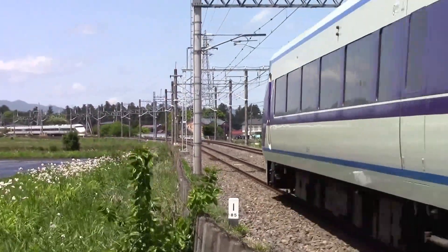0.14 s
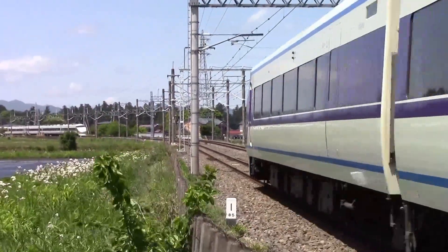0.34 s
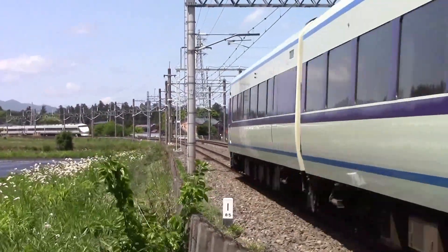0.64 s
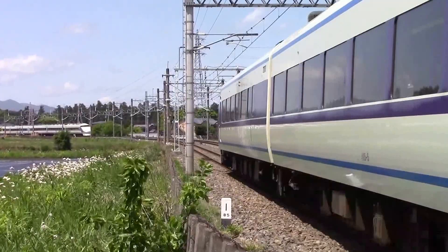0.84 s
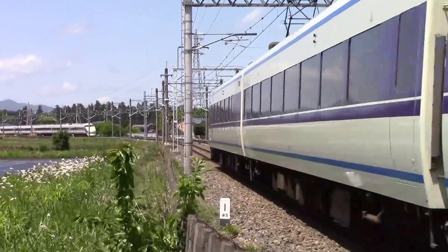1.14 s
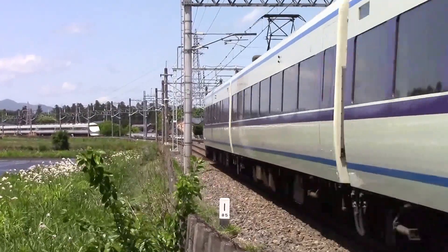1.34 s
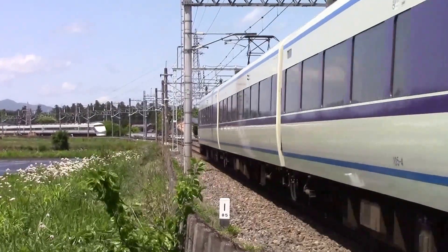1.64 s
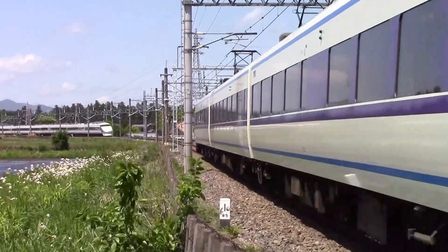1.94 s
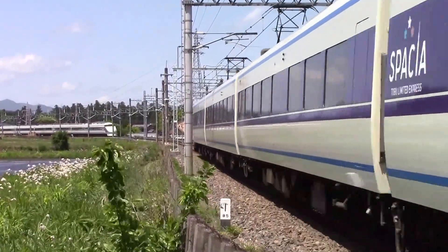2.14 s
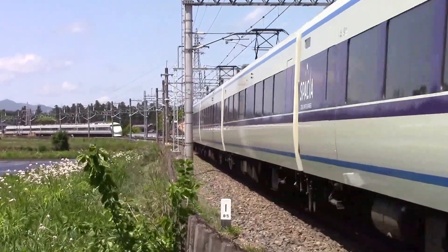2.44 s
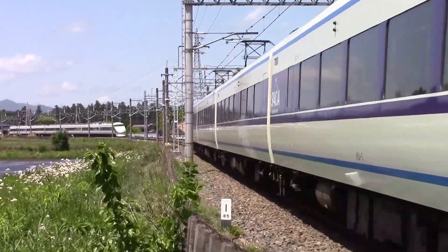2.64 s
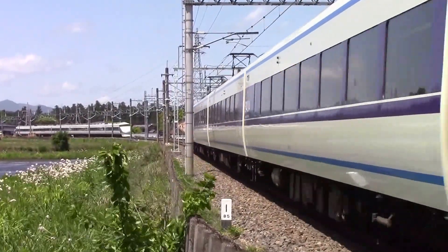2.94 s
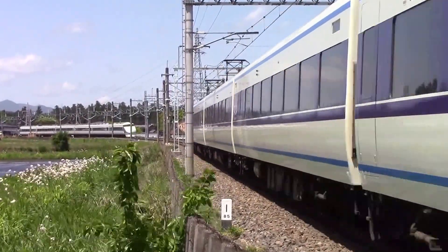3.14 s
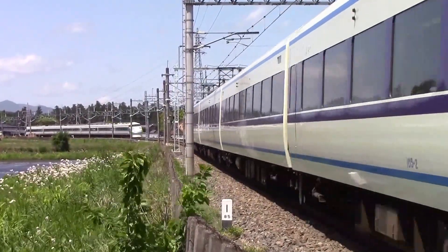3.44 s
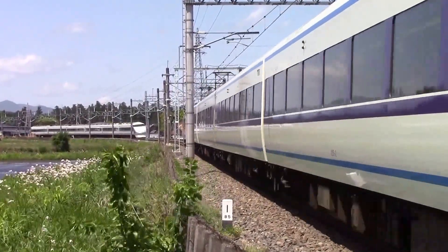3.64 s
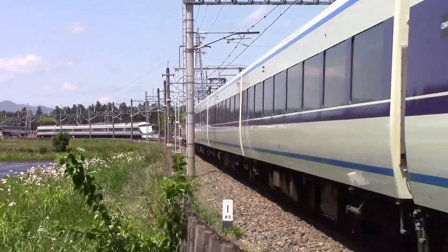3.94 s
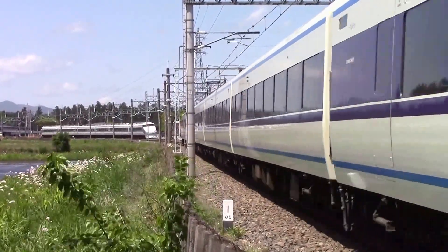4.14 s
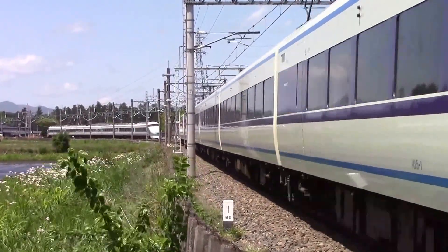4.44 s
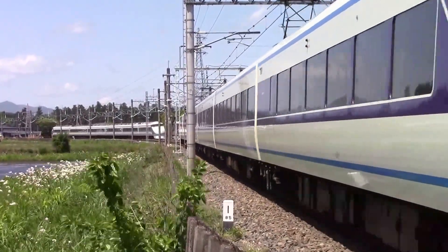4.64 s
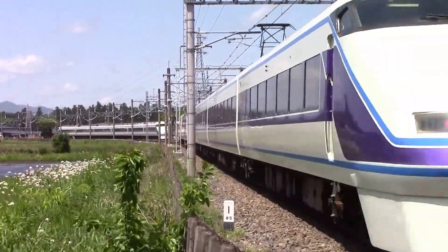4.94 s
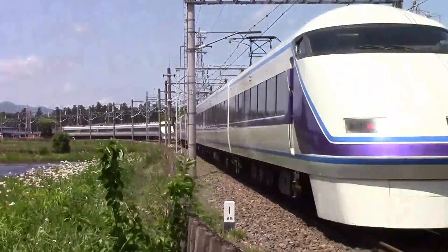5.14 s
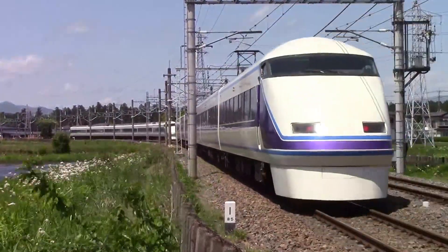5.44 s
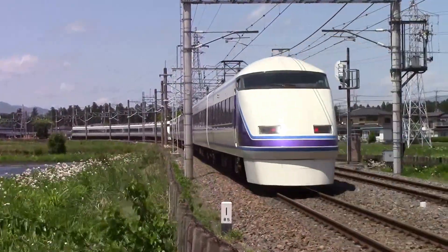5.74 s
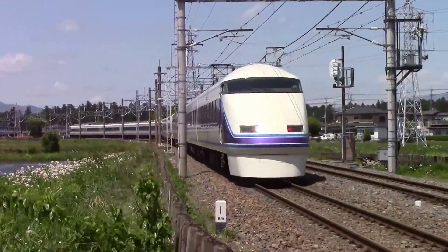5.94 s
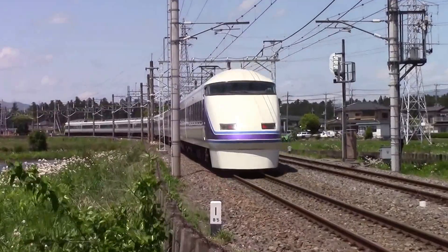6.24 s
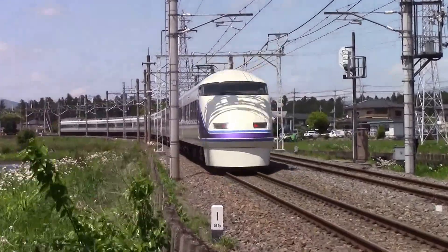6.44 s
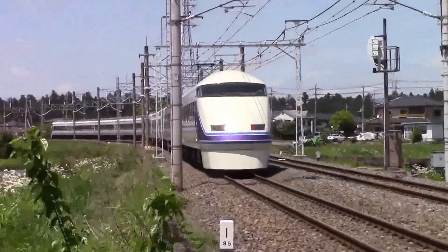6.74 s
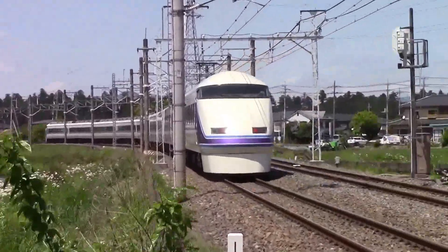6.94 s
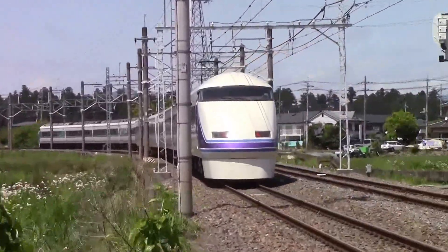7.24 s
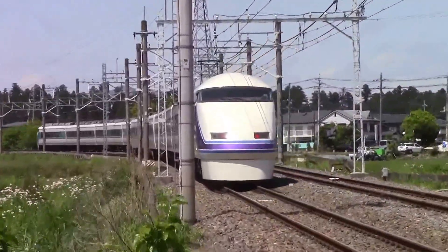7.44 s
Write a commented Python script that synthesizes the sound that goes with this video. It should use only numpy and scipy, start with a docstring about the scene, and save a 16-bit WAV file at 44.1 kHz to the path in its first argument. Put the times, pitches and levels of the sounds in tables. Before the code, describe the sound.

In open country, a fast electric train passes a few metres away. Bright, rough wheel roar and airy hiss surge in pairs as each coupling goes by, with ringing metal tones and brief squeals. After about four and a half seconds the tail passes and the roar falls away, leaving a high wavering whine and faint hum. Wind from its wake thumps the microphone. Outdoor stereo, wide alongside, narrowing with distance.

```python
"""Beside a railway line in open country, an electric express runs past a few metres away and recedes.
Each bogie (wheel set) brings a swell of rolling noise and hiss, made of coloured noise. Some wheels sing:
randomly driven tones that fall in pitch by the Doppler law as they go by, joined by brief squeals.
A high whine, a thin whistle and a low hum, made the same way or as plain sines, carry on from far off.
The wake buffets the microphone with gusts of noise, filtered thumps and short tonal puffs."""
import sys
import numpy as np
from scipy import signal
from scipy.fft import rfft, irfft, next_fast_len
from scipy.io import wavfile

SR = 44100
rng = np.random.default_rng(int(sys.argv[2]) if len(sys.argv) > 2 else 0)


def master_out(mix):
    """Clip the mix to full scale and print it as 16-bit PCM to the path in sys.argv[1]."""
    frames = np.transpose(np.atleast_2d(mix))
    ceiling = np.clip(frames, -1, 1)
    pcm = np.round(ceiling * 32767).astype(np.int16)
    wavfile.write(sys.argv[1], SR, pcm)


N = 334454

# Noise colours, relative levels: (frequency [Hz], level [dB per Hz])
ROAR_COLOUR = [(480, -48), (630, -19), (720, -10), (830, -1.5), (940, -7), (1030, -3.5), (1130, 0),
               (1300, 2), (1430, 1.5), (1600, 3.5), (1950, 2), (2300, -0.5), (2800, -11), (4000, -16.5)]
RASP_COLOUR = [(1700, -38), (2300, 0.5), (2850, 1.5), (3200, 0.5), (3550, 0), (4100, -5), (4800, -10),
               (5600, -12.5), (7000, -18.5), (10000, -79)]
HISS_COLOUR = [(2600, -0.5), (4500, -5.5), (5700, -2), (6700, 2), (7600, 0), (8600, -4.5), (10000, -8.5),
               (11500, -12.5), (13000, -19.5), (15500, -24.5)]
GEAR_COLOUR = [(90, -26), (145, -36), (190, -8), (250, -8.5), (310, -1.5), (375, 3.5), (440, -4),
               (520, -2.5), (650, -16)]
TRACK_COLOUR = [(260, -41), (430, -13), (510, 2.5), (600, 2.5), (690, 4.5), (810, 2), (1050, 3.5)]
AIR_COLOUR = [(15, -8), (30, -6), (48, -1), (100, -8), (160, -5), (300, -2), (600, -32)]
COUNTRY_COLOUR = [(25, -36), (100, -33), (250, -27), (500, -21), (800, -4.5), (1500, 1), (4000, -6),
                  (9000, -23), (15000, -44)]
# How alike left and right are: (frequency [Hz], likeness [0 to 1])
LIKENESS = [(40, .3), (130, .85), (290, .99), (640, .999), (1700, .999), (3100, .97), (5000, .76),
            (6800, .7), (10000, .76), (15000, .8)]

# Bogies come abeam, a pair at each coupling and one at the tail. Levels are relative; brightness is rasp
# over roar: (time [s], roar [dB], brightness [dB], running gear [dB])
BOGIES = [(0.04, -27.5, 0.5, -59), (0.25, -35.5, 7, -69), (0.82, -26, -0.5, -70), (1.13, -26, 2.5, -72),
          (1.66, -24, -0.5, -74), (2.018, -24, 1.5, -67), (2.63, -28, -2.5, -54), (2.91, -27.5, 0.5, -71),
          (3.53, -27.5, -2.5, -64), (3.82, -28, 1, -69), (4.431, -28.5, -1, -50.5)]
SPEED_M_PER_S, DISTANCE_M, SOUND_M_PER_S = 22, 4.0, 343
# How steeply each sound falls off as its bogie moves away (power of the distance)
ROAR_FALLOFF, GEAR_FALLOFF, HISS_FALLOFF = 2.0, 1.77, 1.05
BOGIE_HISS_DB = -39.5  # relative level
# Wheels jolt over rough spots of the rail: (time [s], relative roar [dB])
JOLTS = [(0.64, -29.5), (0.96, -27.5), (2.53, -29), (3.02, -52), (4.38, -27.5), (4.525, -31.5), (6.13, -38)]
JOLT_HALF_S, JOLT_GEAR_DB = 0.039, -35  # the gear level is added to the jolt's own
# The rest of the train, heard along the line, relative levels:
# (time [s], roar [dB], hiss [dB], track [dB], running gear [dB])
FAR_TRAIN = [(0.4, -31, -41.5, -64, -67), (1.4, -35.5, -44, -65, -86), (2.35, -31.5, -44.5, -58, -66),
             (3.25, -37.5, -42.5, -77, -61), (4.2, -36, -40, -57, -62), (4.95, -42.5, -41.5, -56, -71),
             (5.65, -43.5, -46, -54.5, -66), (6.15, -38, -41.5, -49, -61), (6.48, -42.5, -50, -47.5, -66),
             (7.05, -44.5, -52, -51, -65), (7.28, -44, -51, -58, -80), (7.58, -42, -51.5, -44, -65)]
# Spurts of hissing air: (start time [s], relative level [dB])
SPURTS = [(.53, -32), (4.41, -37.5), (5.36, -46), (6.55, -50.5)]
SPURT_ATTACK_S, SPURT_FADE_DB_PER_S = 0.084, 47
# Pits in the running surface ring the rail in short streaks; a ring fades by 60 dB in PIT_RING_S
PITS_PER_S, PIT_SPREAD_DB, PIT_RING_S = 220, 3.0, .075
RAIL_LOW_HZ, RAIL_HIGH_HZ = 1100, 3747
PIT_DB = -6.5  # relative to the roar of the passing bogies

# Some cars set the track droning while they pass, relative levels:
# (start [s], end [s], track [dB], running gear [dB])
DRONES = [(0.52, 1.18, -46.5, -80), (1.215, 2.05, -48, -86), (2.505, 3.023, -48.5, -52.5),
          (4.037, 4.317, -51, -64), (4.294, 4.544, -51, -64)]
DRONE_EDGE_S = 0.018
# Gaps and boxes under the cars push air aside: (time [s], half length [s], relative level [dB])
AIR_PUSHES = [(.06, .12, -70), (0.656, .025, -71.5), (.98, 0.17, -68), (1.62, 0.034, -65),
              (2.01, 0.079, -63.5), (2.53, 0.023, -65), (4.444, .025, -70)]
FAR_AIR_DB = -83.5  # relative level

# Singing wheels: (time abeam [s], frequency at rest [Hz], width [Hz], level at closest [dB])
SINGING = [(-0.12, 6330, 35, -33.5), (-0.08, 3700, 110, -27), (0.02, 6650, 450, -33),
           (0.079, 1636, 141, -29), (0.17, 1482, 45, -30), (1.04, 1486, 70, -32), (0.3, 6310, 260, -37),
           (0.76, 6260, 220, -30), (1.07, 6280, 140, -35), (1.95, 6460, 300, -49), (0.76, 1465, 81, -28),
           (0.859, 1695, 89.7, -33), (0.88, 6620, 750, -28.5), (1.66, 6360, 700, -30.5),
           (1.98, 1717, 128, -30.5), (2.0, 2460, 110, -31), (2.8, 6720, 240, -36.5), (3.7, 6740, 220, -41),
           (4.299, 1617, 120, -39)]
SING_LAG_S, SING_FALLOFF = 0.11, 1.8  # a wheel is loudest just after it has passed
SING_WAVER, SING_WAVER_RATE = 0.00497, 24.8  # share of the pitch; times a second
# Brief squeals of the flanges: (time [s], half length [s], frequency [Hz], width [Hz], level [dB])
SQUEALS = [(.112, .014, 1545, 40, -28), (.26, .016, 1530, 45, -30), (0.429, .11, 1410, 24, -30.5),
           (.635, .018, 1470, 23.7, -24.5), (0.822, 0.087, 2910, 54, -31.5), (.86, .02, 1460, 39.7, -26),
           (0.869, .014, 1665, 60, -26), (0.946, .018, 1405, 40, -30), (1.003, .009, 1400, 40, -25),
           (1.235, .025, 1440, 45, -31), (1.33, .025, 1385, 45, -41), (1.246, 0.024, 3530, 120, -26),
           (1.612, .03, 3650, 160, -29), (1.853, .013, 1660, 70, -23), (1.905, 0.022, 2880, 45, -22.5),
           (2.034, 0.039, 3050, 597, -23), (2.06, .035, 1625, 100, -25), (2.14, .05, 3300, 400, -33),
           (2.525, .03, 1230, 44, -33), (2.539, 0.03, 3670, 110, -28.5), (3.025, .016, 1520, 170, -25),
           (3.406, .02, 2630, 70, -29.5), (4.02, 0.018, 2430, 100.1, -23), (4.212, 0.019, 2600, 100.5, -37),
           (4.628, 0.024, 2360, 70, -29), (5.976, 0.028, 2320, 80.8, -27), (6.097, 0.028, 2305, 80, -25),
           (6.145, 0.024, 3550, 400, -33)]
SQUEAL_SAG_PER_S = 0.085  # share of the pitch

# Rough chorus of the wheels going by: (time [s], frequency [Hz], level [dB])
CHORUS = [(2.35, 2524, -60), (2.55, 2527, -39), (2.72, 2465, -28.5), (2.93, 2460, -27.5), (3.09, 2500, -30),
          (3.25, 2570, -34), (3.41, 2550, -30), (3.55, 2476, -29.5), (3.7, 2448, -26.5), (3.92, 2400, -26),
          (4.03, 2464, -34), (4.12, 2480, -30.5), (4.22, 2555, -32), (4.3, 2490, -29.5), (4.4, 2470, -24),
          (4.51, 2430, -27.5), (4.66, 2380, -29.5), (5.0, 2370, -64)]
CHORUS_WIDTH_HZ = 236
# One wheel stands out of the chorus and wavers about its centre (level before the sum is scaled)
LEAD_DB, LEAD_WIDTH_HZ, LEAD_WAVER, LEAD_WAVER_RATE = -5, 55, .02, 9

# Whine of the distant wheels: (time [s], level [dB])
WHINE = [(4.4, -48), (4.85, -35), (5.1, -37), (5.22, -41.5), (5.37, -36.5), (5.55, -41), (6.05, -33.5),
         (6.42, -37), (6.65, -36), (7.05, -41.5), (7.165, -37), (7.205, -41), (7.245, -35), (7.3, -44),
         (7.38, -32.5), (7.58, -38)]
# Its separate tones come and go:
# (settled frequency [Hz], width [Hz], relative level [dB], strongest at [s], half length [s])
WHINE_LINES = [(2207, 7.2, -6, 6.57, 0.35), (2300, 5.3, -1.5, 6.76, 0.2), (2316, 24, -5.5, 6.1, 0.36),
               (2380, 21, -3.5, 7.12, 0.21), (2278, 120, -2.5, 5.2, 3), (2408, 200, -2.5, 5, 2.5),
               (1116, 60, -14.5, 6.46, 0.9), (1575, 70, -11, 6.87, 0.22), (7250, 900, -11.5, 5.4, .8),
               (3650, 450, -12, 5.1, .7)]
# Shares of the pitch (waver; sag per second); time [s] by which it has stopped sinking
WHINE_WAVER, WHINE_SAG_PER_S, WHINE_SETTLES_S = 0.002005, .008, 6.3
WHINE_THROB_DB, WHINE_THROB_RATE = 0.3, 26  # beating between the wheels; times a second
# A thin whistle far above the whine: (time [s], frequency [Hz], level [dB])
WHISTLE = [(5.8, 12260, -95), (6.12, 12230, -71), (6.3, 12170, -76), (6.7, 12150, -73), (6.95, 12105, -70),
           (7.12, 12200, -71.5), (7.3, 12090, -95)]
WHISTLE_WIDTH_HZ = 22
# Electric hum: (time [s], frequency [Hz], level [dB])
HUM = [(4.6, 732.7, -56), (5.15, 724, -61), (5.5, 728, -49), (5.85, 728, -48.5), (6.2, 723, -43.5),
       (6.42, 722, -50), (7.02, 719, -51.5), (7.58, 710, -66)]
# The train's sound drops abruptly near the end
DROP_S, DROP_LENGTH_S, DROP_DB = 7.05, 0.025, -7.5

# Wake sounds; their levels are those ahead of the wind filter.
# Gusts on the microphone: (time [s], half length [s], level [dB])
GUSTS = [(5.757, 0.019, -56), (5.947, 0.058, -60), (6.447, 0.02, -47), (6.491, .018, -54),
         (6.564, 0.023, -51.5), (6.624, 0.018, -49.5), (6.707, 0.0096, -50.5), (6.825, .025, -51.5),
         (6.897, .018, -49), (6.954, 0.018, -48.5), (7.03, 0.059, -59), (7.152, 0.039, -63),
         (7.433, .04, -72)]
GUST_HZ, GUST_AT_DB, GUST_DB_PER_OCTAVE = 418, -41.5, 54  # stronger gusts sound higher
GUST_WIDTH_SHARE = 0.79  # bandwidth over pitch
# Single eddies thump against the microphone: (time [s], peak level [dB], upper edge [Hz])
THUMPS = [(6.44, -24.5, 1210), (6.4445, -33, 900), (6.4475, -31, 950), (6.454, -32, 750),
          (6.4645, -32, 600), (6.4755, -35, 850), (6.4955, -31, 1350), (6.545, -42, 550), (6.573, -37, 600),
          (6.592, -32, 1100), (6.6025, -31, 650), (6.6095, -33, 600), (6.6315, -30.5, 600),
          (6.701, -38, 650), (6.714, -38, 600), (6.785, -40, 600), (6.822, -33, 750), (6.842, -41, 650),
          (6.87, -34, 520), (6.8995, -24, 850), (6.9035, -33, 900), (6.9138, -27, 1250), (6.918, -35, 500),
          (6.948, -28, 650), (6.953, -30, 1000), (6.966, -41, 500), (7.004, -41, 790), (7.168, -39, 704),
          (7.249, -45, 750)]
THUMP_LOW_HZ, THUMP_TAIL_S, THUMP_TAIL_DB = 268, 0.0042, -24  # each leaves a brief flutter behind
# Rustling among the puffs: (time [s], half length [s], frequency [Hz], width [Hz], level [dB])
RUSTLES = [(7.44, .017, 3350, 700, -42.5), (7.46, .018, 1330, 420, -36.5), (7.515, .018, 601, 400, -47),
           (7.534, .012, 1153, 750, -41), (7.575, 0.0091, 2700, 1300, -40)]
# Short tonal puffs of wind on the microphone: (time [s], rise [s], frequency [Hz], peak level [dB])
PUFFS = [(7.1672, .001, 1000, -31.5), (7.1845, 0.0013, 950, -36), (7.208, .002, 850, -43),
         (7.3442, .002, 1150, -36.5), (7.449, .0032, 1510, -26), (7.456, 0.0013, 1200, -29),
         (7.4625, .0012, 1250, -29), (7.468, .002, 1350, -36), (7.492, 0.0018, 700, -34),
         (7.496, .0015, 950, -32), (7.5053, 0.0032, 900, -26), (7.5088, 0.0012, 1790, -26),
         (7.513, 0.0022, 625, -32), (7.536, .0018, 950, -32), (7.541, .0016, 1150, -33),
         (7.546, .0016, 650, -37)]

# The two microphone ports for sound from the side: (frequency [Hz], left [dB], right [dB])
PORTS = [(1550, 0, 0), (2400, .7, -.8), (3900, 1.9, -2.4), (5300, 2.8, -1.5), (7500, 3.8, .3), (8600, 6, 3),
         (10000, 6, 4), (12600, 1.5, 1.5), (15200, -2, -2)]
# How far the left port lags behind the right: (frequency [Hz], lag [radians])
PORT_LAG = [(1300, 0), (2400, .03), (3900, .2), (5300, .9), (7500, 1.3), (8500, 2.05), (9500, 2.45),
            (12000, 3.05), (15200, 3.14)]
# How much of the train's sound arrives from the side: (time [s], share [0 to 1])
BESIDE = [(0, 1), (4.5, 1), (4.8, .65), (5.1, .15), (5.6, .05), (7.58, 0)]
FAR_WIDTH_DB = -4.5  # the sound narrows as the train recedes
STEADY_BELOW_HZ = 43  # a ring narrower than this holds its strength more evenly
CUTOFF_HZ = 15700


def rolling():
    """Rough steel on steel: a roar and brief rings from the rails, a rasp from the wheels, and hissing air."""
    _, roar_db, bright_db, _ = np.transpose(BOGIES)
    far_db, far_hiss_db, _, _ = in_time(FAR_TRAIN)
    surge = jolts()
    near = passing(roar_db, ROAR_FALLOFF)
    far = from_db(far_db)
    roar = together(near, surge, far)
    rasp = together(passing(roar_db + bright_db, ROAR_FALLOFF), surge, far)
    bogie_hiss = passing([BOGIE_HISS_DB] * len(BOGIES), HISS_FALLOFF)
    spurts = [spurt(s, db) for s, db in SPURTS]
    hiss = together(bogie_hiss, *spurts, from_db(far_hiss_db))
    streaks = from_db(PIT_DB) * near * pits()
    # the small gains balance the three noises
    roar_noise = roar * from_db(0.5) * rush(ROAR_COLOUR, flutter_db=0.4, flutter_rate=34)
    rasp_noise = rasp * from_db(1.38) * rush(RASP_COLOUR, flutter_db=0.7, flutter_rate=14)
    hiss_noise = hiss * from_db(4.5) * rush(HISS_COLOUR, flutter_db=0.5, flutter_rate=14.0)
    return streaks + roar_noise + rasp_noise + hiss_noise


def jolts():
    """Strength of the short surges as wheels hit rough spots."""
    return sum(from_db(db) * bump(s, JOLT_HALF_S) for s, db in JOLTS)


def spurt(s, db):
    """Strength of a spurt of air: a quick rise and a steady fade."""
    t = np.arange(N) / SR - s
    rise = np.sqrt(np.clip(t / SPURT_ATTACK_S, 0, 1))
    return rise * from_db(db - SPURT_FADE_DB_PER_S * np.maximum(t - SPURT_ATTACK_S, 0))


def pits():
    """Wheels hit tiny pits at random; each hit rings one of the rail's many modes for a moment; rms 1."""
    count = 24
    hits = int(PITS_PER_S * N / SR)
    at = rng.integers(0, N, hits)
    mode = rng.integers(0, count, hits)
    sizes = from_db(PIT_SPREAD_DB * np.minimum(rng.exponential(1, hits), 3))
    sizes = sizes * rng.choice([-1, 1], hits)
    out = np.zeros(N)
    decay = from_db(-60 / (PIT_RING_S * SR))  # shrinkage per sample
    for k, hz in enumerate(np.linspace(RAIL_LOW_HZ, RAIL_HIGH_HZ, count)):
        w = 2 * np.pi * hz * rng.uniform(.985, 1.015) / SR
        clicks = np.bincount(at, sizes * (mode == k), N) + 1e-18
        out += signal.lfilter([0, np.sin(w)], [1, -2 * decay * np.cos(w), decay * decay], clicks)
    high_pass = signal.butter(6, RAIL_LOW_HZ, "high", fs=SR, output="sos")
    return rms_one(signal.sosfilt(high_pass, out))


def underside():
    """Running gear rumbles, the track drones under the load, and displaced air throbs, more on the left."""
    _, _, _, gear_db = np.transpose(BOGIES)
    _, _, far_track_db, far_gear_db = in_time(FAR_TRAIN)
    track_drone = sum(from_db(db) * held(start, end) for start, end, db, _ in DRONES)
    gear_drone = sum(from_db(db) * held(start, end) for start, end, _, db in DRONES)
    gear_jolts = from_db(JOLT_GEAR_DB) * jolts()
    gear = together(passing(gear_db, GEAR_FALLOFF), gear_drone, gear_jolts, from_db(far_gear_db))
    track = together(track_drone, from_db(far_track_db))
    pushes = [from_db(db) * bump(s, half_s) for s, half_s, db in AIR_PUSHES]
    air = together(*pushes, from_db(FAR_AIR_DB))
    left_heavy = from_db([[2.2], [-2.2]])
    gear_noise = gear * rush(GEAR_COLOUR, flutter_db=1.0, flutter_rate=8.5)
    track_noise = track * from_db(1.0) * rush(TRACK_COLOUR, flutter_db=2.5, flutter_rate=15)
    air_noise = air * left_heavy * rush(AIR_COLOUR, flutter_db=3.0, flutter_rate=12)
    return gear_noise + track_noise + air_noise


def wheel_rings(throb_db=0.5):
    """Wheels sing, gliding down as they pass, and flanges squeal; the rough rail feeds them unevenly."""
    out = np.zeros(N)
    for s, hz, width_hz, db in SINGING:
        pitch = hz * doppler(s) * (1 + SING_WAVER * drift(SING_WAVER_RATE))
        fading = distance_ratio(s + SING_LAG_S) ** SING_FALLOFF
        out += from_db(db) * resonance(pitch, width_hz) / fading
    for s, half_s, hz, width_hz, db in SQUEALS:
        add_swell(out, s, half_s, hz, -SQUEAL_SAG_PER_S * hz, width_hz, db)
    return from_db(throb_db * drift(39)) * out


def chorus(throb_db=1.0, throb_rate=32):
    """Rear wheels sing in a rough band that rises between the bogies and sinks as each goes by."""
    hz, level_db = in_time(CHORUS)
    lead_hz = hz * (1 + LEAD_WAVER * drift(LEAD_WAVER_RATE))
    lead = from_db(LEAD_DB) * resonance(lead_hz, LEAD_WIDTH_HZ)
    voices = rms_one(resonance(hz, CHORUS_WIDTH_HZ) + lead)
    return from_db(level_db + throb_db * drift(throb_rate)) * voices


def whine():
    """Far off, many wheels sing in a rough band that sinks slowly, then settles; single ones stand out."""
    level_db, = in_time(WHINE)
    shift = 1 + WHINE_SAG_PER_S * np.maximum(WHINE_SETTLES_S - np.arange(N) / SR, 0)
    wheels = np.zeros(N)
    for hz, width_hz, db, s, half_s in WHINE_LINES:
        pitch = hz * (shift + WHINE_WAVER * drift(7.57))
        wheels += from_db(db) * bump(s, half_s) * resonance(pitch, width_hz)
    return from_db(level_db + WHINE_THROB_DB * drift(WHINE_THROB_RATE)) * wheels


def whistle():
    """A thin whistle, a narrow wandering tone that mostly sinks, follows the train away."""
    hz, level_db = in_time(WHISTLE)
    return from_db(level_db) * resonance(hz, WHISTLE_WIDTH_HZ)


def hum(waver_hz=1.34, waver_db=2.0, whirr_hz=805, whirr_width_hz=22, whirr_db=-7):
    """A nearly pure tone from the electrical gear wavers in the moving air, with a softer whirr above it."""
    hz, level_db = in_time(HUM)
    phase = 2 * np.pi * np.cumsum(hz + waver_hz * drift(12.0)) / SR
    tone = from_db(waver_db * drift(8.9)) * np.sqrt(2) * np.sin(phase)
    whirr = from_db(whirr_db) * resonance(whirr_hz, whirr_width_hz)
    return from_db(level_db) * (tone + whirr)


def wake(lumpy_db=3.0):
    """The wake breaks on the microphone in lumpy gusts, thumps and puffs, thinned by its wind filter."""
    out = np.zeros(N)
    for s, half_s, db in GUSTS:
        hz = GUST_HZ * 2 ** ((db - GUST_AT_DB) / GUST_DB_PER_OCTAVE)
        add_swell(out, s, half_s, hz, 0, GUST_WIDTH_SHARE * hz, db)
    out = out * from_db(lumpy_db * drift(89))
    for s, db, top_hz in THUMPS:
        add_thump(out, s, db, top_hz)
    for s, half_s, hz, width_hz, db in RUSTLES:
        add_swell(out, s, half_s, hz, 0, width_hz, db)
    for s, rise_s, hz, db in PUFFS:
        add_puff(out, s, rise_s, hz, db)
    wind_filter = signal.butter(4, 160, "high", fs=SR, output="sos")
    return signal.sosfilt(wind_filter, out)


def add_thump(out, s, db, top_hz):
    """One jolt of pressure and its dying flutter, heard through a broad low band."""
    t = np.arange(SR // 20) / SR
    push = from_db(THUMP_TAIL_DB) * np.exp(-t / THUMP_TAIL_S) * rng.standard_normal(len(t))
    push[0] = 1
    band = signal.butter(2, [THUMP_LOW_HZ, top_hz], "band", fs=SR, output="sos")
    thump = signal.sosfilt(band, push)
    out[int(s * SR):][:len(t)] += from_db(db) * thump / np.abs(thump).max()


def add_puff(out, s, rise_s, hz, db):
    """A short tonal puff of wind on the microphone: a few cycles that swell and die at once."""
    t = np.arange(SR // 25) / SR
    shape = (t / rise_s * np.exp(1 - t / rise_s)) ** 3
    puff = from_db(db) * shape * np.sin(2 * np.pi * hz * t)
    span = out[int(s * SR):][:len(t)]
    span += puff[:len(span)]


def countryside():
    """The faint air of the open country: soft, slowly fluttering noise."""
    return from_db(-51) * rush(COUNTRY_COLOUR, flutter_db=1.6, flutter_rate=2.0)


def from_the_side(pair):
    """Alongside, treble reaches the left port later and mostly stronger; from afar it is narrow, central."""
    size = next_fast_len(N)
    left_db, right_db = in_frequency(PORTS, size)
    lag, = in_frequency(PORT_LAG, size)
    left_port = from_db(left_db) * np.exp(-1j * lag / 2)
    right_port = from_db(right_db) * np.exp(1j * lag / 2)
    beside = irfft(rfft(pair, size) * np.array([left_port, right_port]), size)[:, :N]
    centre = pair.mean(axis=0)
    ahead = centre + from_db(FAR_WIDTH_DB) * (pair - centre)
    share = np.clip(in_time(BESIDE)[0], 0, 1)
    return share * beside + (1 - share) * ahead


def distance_ratio(s):
    """Distance of something that comes abeam at time s, over its least distance."""
    return np.sqrt(1 + ((np.arange(N) / SR - s) * (SPEED_M_PER_S / DISTANCE_M)) ** 2)


def doppler(s):
    """Pitch ratio of something that comes abeam at time s: raised on approach, lowered on leaving."""
    receding_m_per_s = np.gradient(distance_ratio(s)) * DISTANCE_M * SR
    return 1 / (1 + receding_m_per_s / SOUND_M_PER_S)


def passing(levels_db, falloff):
    """Joint strength of all the bogies, each swelling as it nears and fading as it leaves."""
    powers = [from_db(db) ** 2 / distance_ratio(s) ** (2 * falloff)
              for (s, *_), db in zip(BOGIES, levels_db)]
    return np.sqrt(sum(powers))


def together(*strengths):
    """Unrelated noises add in power."""
    return np.sqrt(sum(a ** 2 for a in strengths))


def bump(s, half_s):
    """A smooth rise and fall around one moment."""
    return np.exp(-np.minimum(np.abs(np.arange(N) / SR - s) / half_s, 10) ** 2 / 2)


def held(start_s, end_s):
    """Switches on, holds and switches off, with soft edges."""
    t = np.arange(N) / SR
    return (np.tanh((t - start_s) / DRONE_EDGE_S) - np.tanh((t - end_s) / DRONE_EDGE_S)) / 2


def rush(spectrum, flutter_db, flutter_rate):
    """Turbulent stereo noise of a given colour, dying off beyond its ends; rms 1 before it flutters."""
    size = next_fast_len(N)
    closed = [(spectrum[0][0] / 2, -80), *spectrum, (spectrum[-1][0] * 2, -80)]
    colour_db, = in_frequency(closed, size)
    alike = np.clip(in_frequency(LIKENESS, size)[0], 0, 1)
    mid, side = rfft(rng.standard_normal((2, size))) * from_db(colour_db)
    side = side * np.sqrt((1 - alike) / (1 + alike))
    pair = irfft([mid + side, mid - side], size)[:, :N]
    return rms_one(pair) * from_db(flutter_db * drift(flutter_rate))


def resonance(hz, width_hz, span=slice(None)):
    """A randomly driven tone that wanders at its bandwidth; narrow ones keep a more even strength."""
    wander = drift(width_hz / 2)[span] + 1j * drift(width_hz / 2)[span]
    evenness = .7 / (1 + (width_hz / STEADY_BELOW_HZ) ** 4)
    wander = rms_one(wander / (np.abs(wander) + 1e-9) ** evenness)
    phase = 2 * np.pi * np.cumsum(hz * np.ones(len(wander))) / SR  # hz may glide
    return np.sqrt(2) * (wander.real * np.cos(phase) + wander.imag * np.sin(phase))


def add_swell(out, s, half_s, hz, glide_hz, width_hz, db):
    """A resonance that swells and dies away around one moment, gliding by glide_hz a second."""
    span = slice(max(int((s - 3 * half_s) * SR), 0), min(int((s + 3 * half_s) * SR), N))
    t = np.arange(N)[span] / SR - s
    bell = np.exp(-(t / half_s) ** 2 / 2)
    tone = bell * resonance(hz + glide_hz * t, width_hz, span)
    # give every swell the energy of its bell, whatever the chance
    out[span] += from_db(db) * tone * np.sqrt(np.sum(bell ** 2) / np.sum(tone ** 2))


def drift(rate):
    """Slow chance with spread 1, changing about rate times a second."""
    step, run_in = 8, 8000  # samples per slow value; slow values dropped while the filter settles
    low_pass = signal.butter(2, np.clip(rate, .5, 2000), fs=SR / step, output="sos")
    slow = signal.sosfilt(low_pass, rng.standard_normal(N // step + run_in + 2))[run_in:]
    return np.interp(np.arange(N) / step, np.arange(len(slow)), rms_one(slow))


def in_time(rows):
    """Each column of a curve at every sample."""
    s, *columns = np.transpose(rows)
    return [np.interp(np.arange(N) / SR, s, c) for c in columns]


def in_frequency(rows, size):
    """Each column of a spectrum at every bin of a transform."""
    hz, *columns = np.transpose(rows)
    bins = np.maximum(np.fft.rfftfreq(size, 1 / SR), 1)
    return [np.interp(np.log(bins), np.log(hz), c) for c in columns]


def from_db(db):
    """Decibels to gain."""
    return 10 ** (np.asarray(db) / 20)


def rms_one(x):
    """Scale to unit rms (average strength 1)."""
    return x / np.sqrt(np.mean(np.abs(x) ** 2) + 1e-20)


def scene():
    """The passing train, its wake, and the faint air of the open country."""
    drop = from_db(DROP_DB * np.clip((np.arange(N) / SR - DROP_S) / DROP_LENGTH_S, 0, 1))
    wheels = rolling() + underside() + wheel_rings() + chorus()
    train = drop * (wheels + whine() + whistle() + hum())
    return from_the_side(train) + wake() + countryside()


def record(dry):
    """A steep low-pass filter removes the very top of the treble."""
    low_pass = signal.ellip(12, .1, 80, CUTOFF_HZ, fs=SR, output="sos")
    return signal.sosfilt(low_pass, dry)


dry = scene()
out = record(dry)
master_out(out)
```